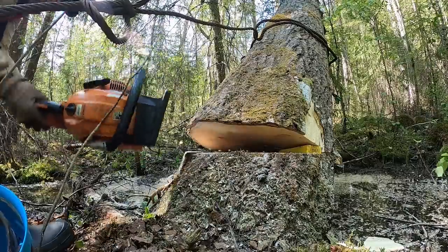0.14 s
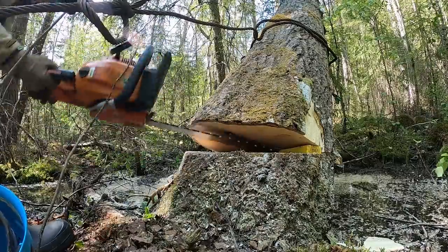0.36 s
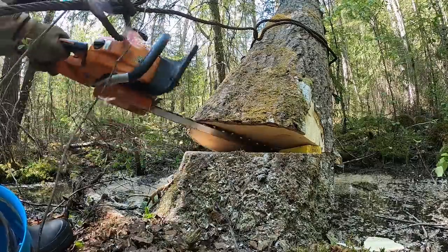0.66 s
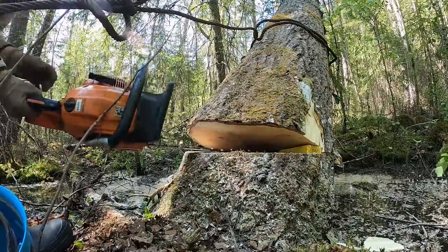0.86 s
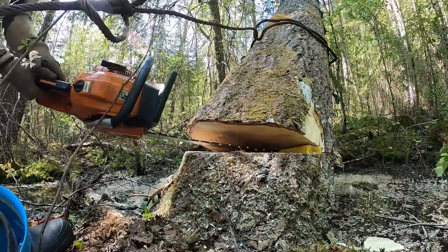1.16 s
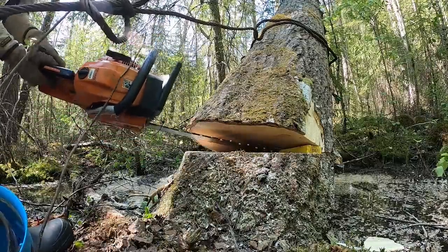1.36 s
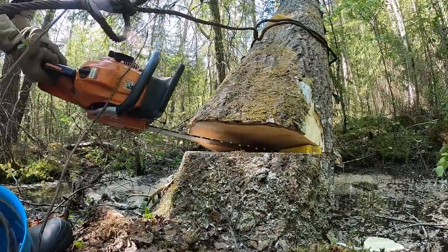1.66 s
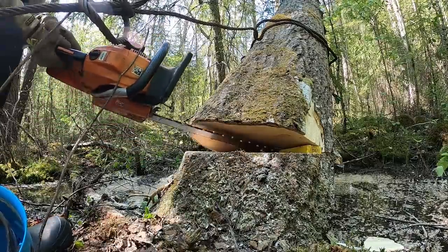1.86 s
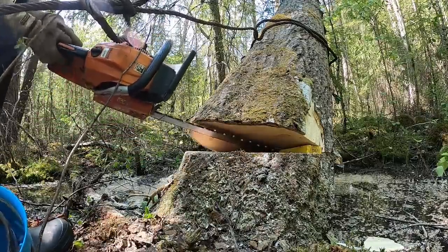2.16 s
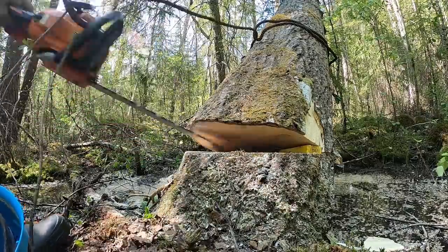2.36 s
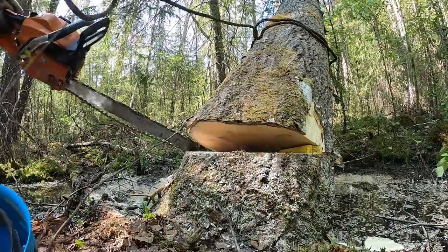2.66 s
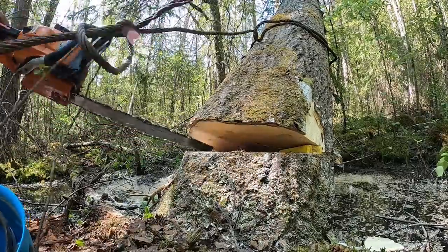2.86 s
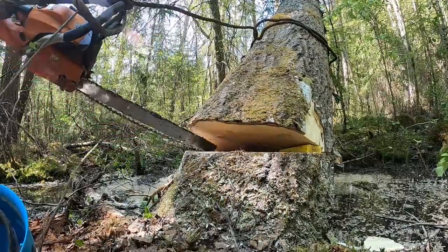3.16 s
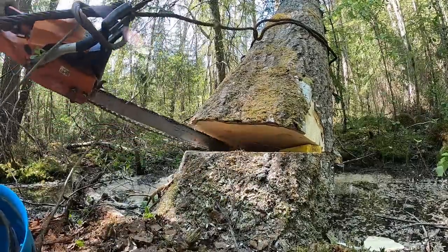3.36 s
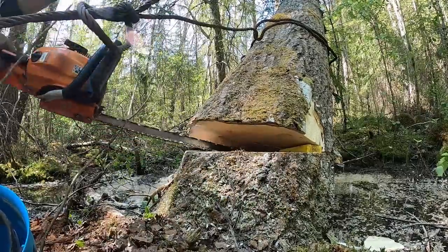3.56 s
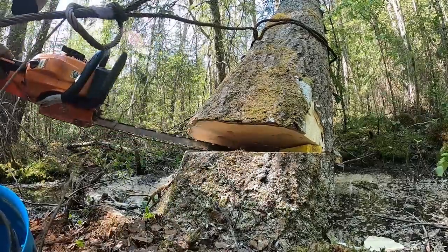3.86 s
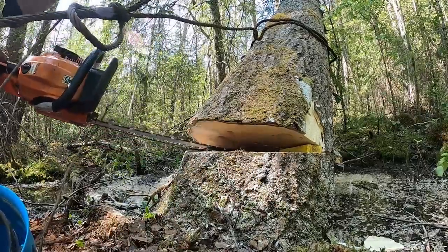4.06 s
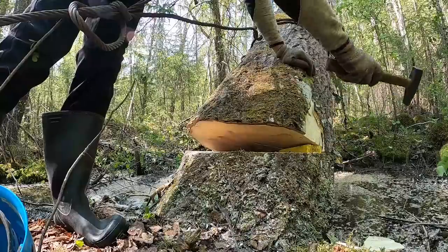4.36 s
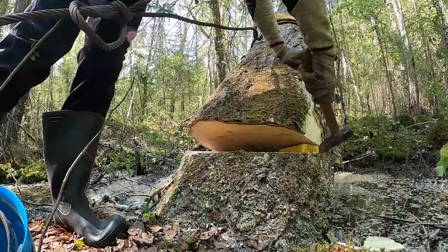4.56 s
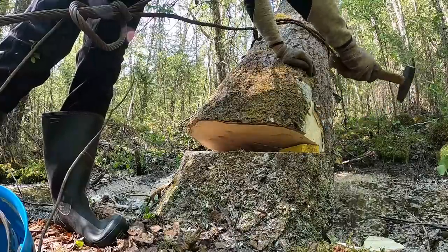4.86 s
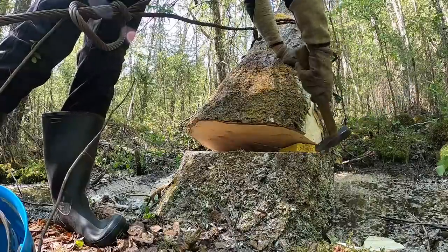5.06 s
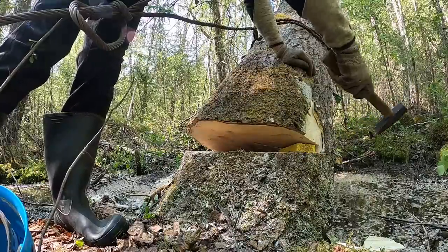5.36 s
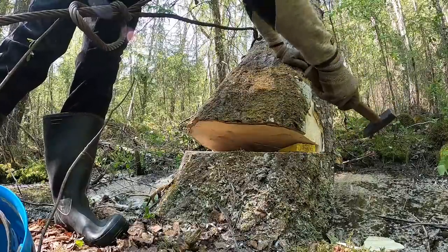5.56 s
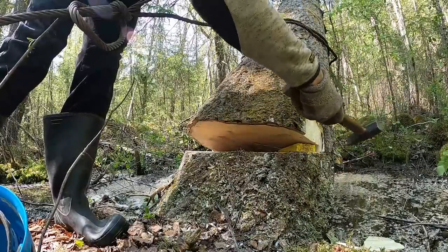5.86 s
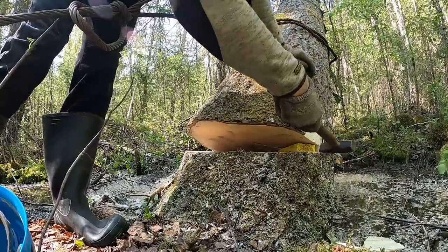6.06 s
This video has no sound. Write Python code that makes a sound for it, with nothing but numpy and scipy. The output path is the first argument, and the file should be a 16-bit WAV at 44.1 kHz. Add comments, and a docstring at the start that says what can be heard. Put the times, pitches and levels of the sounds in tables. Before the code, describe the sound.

Close by in a quiet forest, dry twigs snap and rustle while boots and wood thud on soft ground. After a short lull the crackling returns, the bar of a stopped chainsaw pings and its chain briefly catches in the cut. A hammer then drives a wedge into a trunk with three hard blows, each a short clink over a woody boom. One light tap comes last.

```python
"""A quiet forest, a stereo microphone close to a worker shifting a stopped saw. From the start dry twigs
snap and rustle, and heavier wood and boots thud on soft ground. After a lull with one faint far peep
they stir again and the saw bar pings. Near 3.7 s the chain teeth catch in the cut. From 4.2 s a hammer
drives a wedge into a trunk: three hard blows among lighter touches, the wedge ringing over the trunk's
boom. Two faint rings hang in the distance, and one light tap comes last."""
import sys
import numpy as np
from scipy import signal
from scipy.fft import rfft, irfft, next_fast_len
from scipy.io import wavfile
from scipy.ndimage import uniform_filter1d

SR = 44100
rng = np.random.default_rng(int(sys.argv[2]) if len(sys.argv) > 2 else 0)


def int16_out(signal):
    """Quantize to a 16-bit WAV file."""
    q = np.round(np.clip(np.atleast_2d(signal).T, -1, 1) * 32767)
    wavfile.write(sys.argv[1], SR, q.astype(np.int16))


N = 273861

# hush of far leaves and air: freq_hz, density_db
AIR_COLOUR = [(110, -19.5), (150, 2), (274, -3.5), (620, -14.5), (748, -19.5), (1090, -6.5), (1920, -8.5),
              (4090, -10.5), (7350, -17.5), (15000, -63.5)]
# how alike the hush is left and right: freq_hz, likeness
AIR_LIKENESS = [(60, 0.19), (380, 0.86), (2380, 0.58), (15000, 0.0304)]
# far leaves swelling: time_s, gain_db
BREEZE = [(0, 4.5), (1.3, 1), (1.65, -2.5), (2., 1), (4.2, 1), (5., -0.5), (6.2, 2)]
# swells of rumble from ground and air at the microphone: top_s, level_db, fade_db_per_s
RUMBLE_SWELLS = [(.2, -39, 320), (.46, -51, 216), (1.3, -54, 162), (1.559, -51.5, 299), (1.96, -47.5, 167),
                 (2.81, -28, 129), (3.56, -41, 107), (3.96, -43, 93), (4.238, -43, 109.5),
                 (4.7, -51.5, 101), (5.1, -49, 59), (5.221, -49, 150.5), (6.2, -55, 101)]
# colour of that rumble: freq_hz, density_db
RUMBLE_COLOUR = [(15, -4.5), (35, 13), (80, -4), (160, -7.5), (320, -22), (600, -46.5)]
# far off, a high peep, then two rings after the last hard blow: start_s, length_s, pitch_hz, level_db
FAR_RINGS = [(1.663, 0.14, 5020, -63.5), (5.252, 0.26, 1630, -58.5), (5.42, .16, 2090, -61.5)]
# echoes off the surrounding trunks: freq_hz, t60_s
ECHO_DECAY = [(300, 0.1), (1000, 0.36), (2200, 0.44), (8000, 0.051)]
# where the worker moves in front of the microphone: time_s, left_over_right_db
WORKER_PAN = [(0, 1), (2.2, 3), (2.5, 1), (2.8, 7), (3.1, 2.5), (3.45, 4)]
# how alike close wood is left and right: freq_hz, likeness
NEAR_LIKENESS = [(100, 1), (1400, 0.96), (3100, 0.74), (7000, 1), (12000, 0.0475)]
# colour of breaking wood: freq_hz, density_db
TWIG_COLOUR = [(88, -58), (150, -7), (332, -8), (583, -9.5), (1170, -5.5), (3910, -9), (4750, -9),
               (7410, -18), (15500, -45.5)]
# tiny twigs and bark stirring; the last row is a dull rustling echo after the second hard blow:
# top_s, level_db, hold_s, treble_db
RUSTLES = [(0.152, -24, 0.005, -15), (0.337, -38.5, 0.0079, -12), (0.454, -31, 0.037, -5),
           (0.622, -34.5, 0.036, -6.5), (0.855, -29, 0.0062, -11.5), (0.941, -34.5, 0.08, -15),
           (1.161, -48, 0.046, -22), (1.846, -56, 0.084, -5), (1.896, -51.5, 0.2, -8),
           (2.458, -28.5, 0.086, -9.5), (2.521, -23.5, 0.054, -2), (2.642, -36, 0.25, -1.5),
           (2.94, -41.5, 0.11, -2), (3.059, -30, 0.017, -13), (3.138, -43.5, 0.33, -4),
           (3.486, -40.5, 0.076, -7), (3.645, -37.5, 0.12, -4), (3.829, -53.5, 0.22, 1),
           (4.74, -53, 0.074, -13)]
# twigs breaking close by: break_s, level_db, ring_hz, treble_db
SNAPS = [(.0036, -28.5, 1900, -15.5), (0.0382, -32, 1080, -23), (0.09, -38.5, 990, -1),
         (.106, -35, 1630, -24), (0.1373, -21, 1160, -3.5), (0.1514, -23.5, 1160, -13),
         (0.166, -28.5, 3100, -2), (0.1749, -20.5, 2100, -7), (0.1853, -32, 1630, -20),
         (.216, -33.5, 1530, -4), (0.2832, -25.5, 1500, -6), (0.338, -34.5, 1300, 1),
         (0.397, -27, 1350, -4.5), (.427, -16.5, 1060, -14.5), (0.4447, -20.5, 2460, -2),
         (0.463, -25, 1780, 4), (0.4722, -24, 770, -5), (0.4895, -19.5, 3200, 7.5), (0.496, -29, 3100, 15),
         (0.5113, -28.5, 1140, 6), (0.591, -19.5, 1280, -4.5), (0.6103, -31, 1100, -5),
         (0.629, -25.5, 990, 0), (0.633, -18.5, 2960, 0), (0.641, -24.5, 1310, -7), (0.6653, -22, 2270, -1),
         (0.6773, -26.5, 3050, 12), (0.6978, -25.5, 2190, -9), (.735, -37.5, 1170, 4),
         (0.7775, -31, 2380, -3), (0.8108, -19, 1600, -13), (0.826, -20.5, 2700, -2),
         (0.8334, -13.5, 2670, -10.5), (0.8548, -25.5, 813, -8), (0.865, -32, 1800, -6),
         (0.889, -24, 1640, -10), (0.938, -29, 2000, -7), (0.9547, -29, 2610, -13),
         (.981, -27.5, 1260, -25), (0.9853, -17.5, 1660, -5.5), (1.009, -31.5, 4150, 24),
         (1.024, -28, 1830, -8), (1.0767, -27, 2200, -10), (1.1177, -34.5, 1460, -15),
         (1.184, -45.5, 1890, 11), (1.2294, -43, 1070, 0), (1.292, -45.5, 1850, 4),
         (1.3608, -41.5, 2350, 10), (1.4436, -48.5, 1866, -2), (1.824, -47, 1400, -17),
         (2.027, -41.5, 1110, -20), (2.062, -49, 1710, -8), (2.161, -42, 4460, 10),
         (2.412, -43.5, 1170, -19), (2.452, -28, 2120, 13), (2.4666, -25.5, 4870, 6.5),
         (2.478, -29, 4260, 12), (2.5145, -18, 1770, -0.5), (2.5266, -17.5, 1020, -7),
         (2.5552, -25, 2350, 3), (2.571, -28, 3970, 10), (2.58, -26.5, 1650, 3), (2.6545, -28, 985, -37),
         (2.7, -27, 1810, -13), (2.7232, -40, 5840, 14), (2.7964, -27, 2120, 9), (2.813, -24.5, 1930, 1),
         (2.846, -24, 3950, -0.5), (2.911, -33, 2440, -9), (2.944, -38.5, 4300, 29),
         (2.985, -32.5, 2400, 2), (2.9899, -19, 2360, 6), (3.007, -24.5, 2400, 4), (3.0107, -20, 1200, 1),
         (3.0449, -23, 3000, 0), (3.0635, -33, 2320, -13), (3.079, -29, 2770, -15),
         (3.2327, -20.5, 1090, 2), (3.2641, -29.5, 970, -2), (3.3812, -36, 2440, -1),
         (3.4118, -30.5, 1860, -1), (3.444, -25.5, 2000, 1), (3.474, -37.5, 1060, -11),
         (3.49, -22.5, 2400, 7.5), (3.5047, -33, 2500, -5), (3.618, -36, 2420, -12),
         (3.645, -34.5, 3900, 32), (3.656, -31, 2070, -13), (3.672, -50, 3460, 6), (3.6973, -24, 2540, -2),
         (3.8633, -33, 950, 1), (3.89, -36.5, 1000, -6), (3.963, -43.5, 1786, 2), (4.08, -46.5, 5800, 9)]
# heavy wood and boots on soft ground: start_s, level_db, first_hz, last_hz, t60_s
THUDS = [(0.137, -32.5, 564, 242, 0.15), (0.314, -36.5, 300, 220, 0.051), (0.4273, -8, 556, 230, 0.046),
         (0.435, -18, 130, 112, 0.082), (0.628, -32.5, 295, 142, 0.13), (0.8172, -9, 523, 247, 0.037),
         (0.822, -25, 132, 110, 0.15), (0.963, -39, 255, 211, 0.11), (1.182, -39, 288, 213, 0.038),
         (2.437, -31, 298, 193, 0.1), (2.532, -17.5, 400, 187.6, 0.1), (2.791, -7, 275, 120, 0.036),
         (3.03, -23.5, 380, 214, 0.041), (3.418, -32, 257, 107, 0.066), (3.544, -20.5, 446, 94, 0.092),
         (3.941, -31, 148, 58.5, 0.041)]
# pings of the saw bar: start_s, level_db, damped_from_s
PINGS = [(2.457, -38, 2.65), (2.556, -31, 2.5), (2.702, -33.5, 2.762)]
# modes of the free bar: pitch_hz, level_db, t60_s
BAR_MODES = [(4347, 0, .6), (6864, -12, .12)]
# single chain teeth catching: start_s, level_db
TOOTH_CATCHES = [(3.7249, -21.5), (3.7409, -19.5), (3.7628, -20)]
# quick drags of the chain: start_s, end_s, level_db, teeth_per_s
CHAIN_DRAGS = [(3.706, 3.782, -35, 330), (3.79, 3.822, -30, 165)]
# modes of the bar held in the cut: pitch_hz, level_db
CUT_MODES = [(700, -5), (1000, 0), (1300, 2), (1730, 3.5), (2380, -9), (3400, -7)]
# hammer on the wedge: start_s, level_db, favoured_hz, boom_db, tilt_db_per_octave
BLOWS = [(4.198, -36.5, 1250, -32, -4), (4.209, -22.5, 1260, -48.5, -7), (4.2197, 0.5, 1640, -6, -3),
         (4.482, -43.5, 1295, -70.5, 6.5), (4.671, -33, 820, -66, 0), (4.6824, -27, 860, -60, -8.5),
         (4.6882, -7, 1160, -59, -16.5), (4.6924, -0.5, 1930, -12, -0.5), (4.733, -37, 1150, -39, -6),
         (5.183, -33, 1250, -59, -4.5), (5.1944, -14, 1280, -29, -4.5), (5.1969, -17, 1250, -28, -7),
         (5.2033, 0.5, 1770, -16.5, -2.5), (5.248, -35, 1560, -36, -6), (6.187, -29.5, 1520, -40, 6.5)]
# modes of wedge and hammer head: pitch_hz, level_db, t60_s
WEDGE_MODES = [(756, -9.5, 0.026), (1230, -2, 0.009), (1652, -4.5, 0.013), (2037, -6, 0.0099),
               (2600, -5, 0.0085), (3310, 12, 0.0023), (4420, -5, 0.0078), (5670, -10.5, 0.0079),
               (7550, -15, 0.0035), (9730, -18, 0.0021), (12980, -22, 0.0036)]
# boom of the trunk: first_hz, last_hz, t60_s
TRUNK_BOOM = (460, 141, 0.055)
# treble balance of the microphone pair: freq_hz, left_over_right_db
MIC_BALANCE = [(6000, 1), (9000, -1.5), (15000, -6.5)]

AIR_DB, RUMBLE_REST_DB = -59, -68.5
STIR_DB_PER_S, SETTLE_DB_PER_S = 310, 230
LEAD_IN_SAMPLES, SNAP_T60_S, CUT_T60_S = 176, 0.032, 0.021
DUCK_ABOVE_DB, BAND_EDGE_HZ = -19.5, 15750


def amp(db):
    """Decibels to gain."""
    return 10 ** (np.asarray(db) / 20)


def unit_rms(x):
    """Scales to rms 1."""
    return x / np.sqrt(np.mean(x ** 2) + 1e-20)


def at_hz(table, hz):
    """Value of a table on a log-frequency axis."""
    freq_hz, value = np.transpose(table)
    return np.interp(np.log(hz + 1), np.log(freq_hz + 1), value)


def add(mix, start_s, sound):
    """Mixes a sound into a stereo track."""
    part = mix[:, round(start_s * SR):][:, :sound.shape[-1]]
    part += sound[..., :part.shape[1]]


def pan(db):
    """Left and right gains, db apart."""
    return amp([db / 2 * np.ones(1), -db / 2 * np.ones(1)])


def stereo_noise(a, b, likeness, gain):
    """Blends noises a and b into a pair, alike by the table likeness and coloured by gain(hz)."""
    size = next_fast_len(len(a))
    hz = np.fft.rfftfreq(size, 1 / SR)
    alike = np.clip(at_hz(likeness, hz), 0, 1)
    left = rfft(a, size)
    right = alike * left + np.sqrt(1 - alike ** 2) * rfft(b, size)
    return unit_rms(irfft(np.array([left, right]) * gain(hz), size)[:, :len(a)])


def smoothed(noise, samples):
    """Running mean of a noise, at rms 1."""
    return unit_rms(uniform_filter1d(noise, size=samples))


def swell(top_s, db, hold_s, rise_db_per_s, fade_db_per_s):
    """Power of one swell: rises until top_s, holds, fades."""
    t = np.arange(N) / SR - top_s
    return amp(2 * (db + rise_db_per_s * np.minimum(t, 0) - fade_db_per_s * np.maximum(t - hold_s, 0)))


def hush():
    """Leaves and air far off, and a lumpy rumble of ground and air at the microphone."""
    a, b, c, d, lumps = rng.standard_normal((5, N))
    air = stereo_noise(a, b, AIR_LIKENESS, lambda hz: amp(at_hz(AIR_COLOUR, hz)))
    air *= amp(np.interp(np.arange(N) / SR, *np.transpose(BREEZE)))
    rumble = stereo_noise(c, d, [(25, 0.68), (100, 0.52)], lambda hz: amp(at_hz(RUMBLE_COLOUR, hz)))
    swells = sum(swell(s, db, 0, 1.14 * fade, fade) for s, db, fade in RUMBLE_SWELLS)
    rumble *= np.sqrt(swells + amp(2 * RUMBLE_REST_DB))
    return amp(AIR_DB) * air * pan(0.53) + rumble * amp(0.89 * smoothed(lumps, 2000))


def far_ring(length_s, pitch_hz, db):
    """A fuzzy narrow ring that swells and fades deep in the forest."""
    noise = rng.standard_normal((2, round(length_s * SR)))
    ring = unit_rms(signal.lfilter(*signal.iirpeak(pitch_hz, Q=14, fs=SR), noise))
    return amp(db) * ring * np.hanning(noise.shape[1]) ** .5


def trunk_echoes(x):
    """Sparse echoes off the trunks all round, each band dying at its own speed."""
    taps = np.zeros((2, SR))
    arrivals = np.arange(900, SR - 20, 20) + rng.integers(0, 20, (2, (SR - 901) // 20))
    np.put_along_axis(taps, arrivals, rng.choice([-1., 1.], arrivals.shape), 1)
    hz, t, bands = signal.stft(taps, SR, nperseg=256)
    build_up = np.minimum(t / 0.21, 1)  # the trunks stand apart, so the echoes gather slowly
    decay = amp(-60 * t / at_hz(ECHO_DECAY, hz)[:, None])
    tail = signal.istft(bands * build_up * decay, SR, nperseg=256)[1]
    return signal.fftconvolve(x.mean(0)[None], tail / np.linalg.norm(tail[0]), axes=1)[:, :N]


def rustle():
    """Tiny uneven cracks come in clumps; thick and thin pieces crack partly on their own."""
    swells = np.array([swell(s, db, hold, STIR_DB_PER_S, SETTLE_DB_PER_S) for s, db, hold, _ in RUSTLES])
    treble_db = np.transpose(RUSTLES)[3][swells.argmax(0)]  # the loudest swell sets the colour
    treble_db = uniform_filter1d(treble_db, size=1300)
    a, b = rng.standard_normal((2, N))
    noise = stereo_noise(a, b, NEAR_LIKENESS, lambda hz: amp(at_hz(TWIG_COLOUR, hz)))
    sizes = amp(2.8 * np.minimum(rng.exponential(1, (7, N)), 3))
    cracks = sizes * (rng.random((7, N)) < 180 / SR)
    shared, *per_band = signal.lfilter([1], [1, -np.exp(-1 / (0.0021 * SR))], cracks)
    out, below = np.zeros((2, N)), 0
    for top_hz, own in zip([700, 1400, 2400, 4000, 8000, 20000], per_band):
        up_to = signal.sosfiltfilt(signal.butter(2, top_hz, fs=SR, output="sos"), noise)
        crackle = unit_rms(0.3 + 0.7 * unit_rms(shared) + 1.4 * unit_rms(own))
        treble = amp(treble_db * np.clip(0.63 * np.log2(top_hz / 2800), 0, 1.6))
        out += (up_to - below) * crackle * treble
        below = up_to
    clumps = amp(1.52 * smoothed(rng.standard_normal(N), 600))
    return out * unit_rms(clumps) * np.sqrt(swells.sum(0))


def twig_gain(hz, rings_hz, treble_db):
    """Colour of one twig: three rings, more treble if thin and dry, too small to radiate bass."""
    shelves_db = treble_db / (1 + (3500 / (hz + 1)) ** 4) - 7 / (1 + (11000 / (hz + 1)) ** 4)
    rings = 1 + sum(g / (1 + ((hz - f) / (0.076 * f)) ** 2) for f, g in zip(rings_hz, [1.5, .7, .7]))
    bass_cut = 1 / (1 + (450 / (hz + 1)) ** 3)
    return amp(at_hz(TWIG_COLOUR, hz) + shelves_db) * rings * bass_cut


def twig_snap(db, ring_hz, treble_db):
    """Fibres tear in a quick burst and ring the twig near one pitch; the treble dies first."""
    t = (np.arange(3072) - LEAD_IN_SAMPLES) / SR  # a faint 4 ms lead-in softens each snap's start
    after = np.maximum(t, 0)
    t60 = SNAP_T60_S * amp(4 * rng.standard_normal())
    a, b, lumps = rng.standard_normal((3, len(t)))
    rings_hz = ring_hz * np.append(1, 2 ** rng.uniform(-1, 1.374, size=2))
    burst = stereo_noise(a, b, NEAR_LIKENESS, lambda hz: twig_gain(hz, rings_hz, treble_db))
    burst *= amp(0.19 * smoothed(lumps, 40))
    dull = signal.lfilter(*signal.butter(2, 3000, fs=SR), burst)
    bright = (burst - dull) * amp(-25 * after / t60)
    lead_in = amp(-19.5 + 8500 * np.minimum(t, 0)) * np.exp(-after / 0.0004)
    tear = amp(-60 * after / t60) * (1 - np.exp(-after / 0.00013))
    scrape = amp(-18.5 - 60 * after / 0.055) * (1 - np.exp(-after / 0.001))  # the broken ends rub on
    sound = burst * lead_in + (dull + bright) * tear + dull * scrape
    return amp(db) * sound / np.sqrt(np.mean(sound[:, LEAD_IN_SAMPLES:LEAD_IN_SAMPLES + 260] ** 2))


def thud(db, first_hz, last_hz, t60):
    """A heavily damped push whose pitch sinks as the contact spreads; wood and soil shudder on."""
    t = np.arange(12000) / SR
    hz = last_hz + (first_hz - last_hz) * np.exp(-t / 0.0033)
    turns = np.cumsum(hz) / SR
    onset = np.sin(np.minimum(2 * turns, np.pi / 2)) ** 2
    push = amp(-60 * t / t60) * onset * -np.sin(2 * np.pi * turns)
    noise = rng.standard_normal((2, len(t))) * 0.12 + rng.standard_normal(len(t))
    band = signal.butter(1, [0.62 * last_hz, 1.09 * last_hz], "band", fs=SR)
    shudder = unit_rms(signal.lfilter(*band, noise))
    shudder = signal.lfilter(*signal.butter(2, 500, fs=SR), shudder)
    shudder *= amp(-10.5 - 60 * t / (3.46 * t60)) * (1 - np.exp(-t / 0.0011))
    return amp(db) * (push / abs(push).max() + shudder)


def bar_ping(start_s, db, damped_from_s):
    """The steel saw bar rings in its modes and dies fast once it touches wood."""
    t = np.arange(6000) / SR
    ring = sum(amp(mode_db - 60 * t / t60) * np.sin(2 * np.pi * hz * t) for hz, mode_db, t60 in BAR_MODES)
    touching_s = np.maximum(t + start_s - damped_from_s, 0)
    return amp(db - 60 * touching_s / 0.036) * ring * pan(2.3)


def chain_teeth():
    """Each tooth that catches knocks the bar in the cut, its modes struck unevenly."""
    catches = list(TOOTH_CATCHES)
    for start_s, end_s, db, per_s in CHAIN_DRAGS:
        times = np.arange(start_s, end_s, 1 / per_s)
        jitter, size = rng.standard_normal((len(times), 2)).T
        catches += zip(times + 0.15 * jitter / per_s, db + 2.2 * size)
    t, out = np.arange(1500) / SR, np.zeros((2, N))
    hz, mode_db = np.transpose(CUT_MODES)[:, :, None]
    for start_s, db in catches:
        uneven, phase = rng.standard_normal((2, len(CUT_MODES), 1))
        modes = np.sin(2 * np.pi * (hz * (1 + 0.043 * uneven) * t + phase))
        knock = (amp(mode_db + 2.5 * uneven - 60 * t / CUT_T60_S) * modes).sum(0)
        knock *= 1 - np.exp(-t / 0.0003)
        add(out, start_s, amp(db) * knock / abs(knock).max())
    return out


def hammer_blow(db, favoured_hz, boom_db, tilt_db):
    """The wedge rings briefly, most in the modes the struck spot favours; the trunk booms just after."""
    t = np.arange(12000) / SR
    hz, mode_db, t60 = np.transpose(WEDGE_MODES)[:, :, None]
    spot_db = -10 * np.minimum(abs(np.log2(hz / favoured_hz)), 1.2)
    crisp_db = tilt_db * np.log2(1 + hz / 2000)  # a square hit is crisper than a glancing one
    phase = rng.random(hz.shape) + 0.033 * rng.standard_normal((2, *hz.shape)) * np.sqrt(hz / 4000)
    modes = np.sin(2 * np.pi * (hz * t + phase))
    ring = (amp(mode_db + spot_db + crisp_db - 60 * t / t60) * modes).sum(1)
    ring *= 1 - np.exp(-(t / (.0003 - 3e-5 * db)) ** 2)  # lighter touches start more softly
    grit = rng.standard_normal((2, len(t))) * amp(-22 - 60 * t / 0.033)  # bark and fibres crush
    dull = signal.lfilter(*signal.butter(1, 3600, fs=SR), ring)
    ring += signal.oaconvolve(dull, grit, axes=1)[:, :len(t)]
    boom = np.roll(thud(boom_db, *TRUNK_BOOM), round(0.002 * SR), axis=1)
    return amp(db) * ring / abs(ring.mean(0)).max() * pan(-2.7) + boom


def scene():
    """Twigs, thuds, saw and hammer up close, with their echoes and the hush behind."""
    worker, hammer, background = rustle() + chain_teeth(), np.zeros((2, N)), hush()
    for break_s, *row in SNAPS:
        add(worker, max(break_s - LEAD_IN_SAMPLES / SR, 0), twig_snap(*row))
    worker *= pan(np.interp(np.arange(N) / SR, *np.transpose(WORKER_PAN)))
    for start_s, *row in THUDS:
        add(worker, start_s, thud(*row))
    for start_s, *row in PINGS:
        add(worker, start_s, bar_ping(start_s, *row))
    for start_s, *row in BLOWS:
        add(hammer, start_s, hammer_blow(*row))
    for start_s, *row in FAR_RINGS:
        add(background, start_s, far_ring(*row))
    bark = smoothed(rng.standard_normal(N), 50)  # rough trunks smear the ring of the wedge
    echoes = trunk_echoes(amp(-34) * worker + amp(-41) * hammer * bark)
    return background + echoes + worker + hammer


def record(dry):
    """Microphone pair, gain control that ducks the hush after loud hits, soft overload, band limit."""
    size = next_fast_len(N)
    balance = pan(at_hz(MIC_BALANCE, np.fft.rfftfreq(size, 1 / SR)))
    left, right = irfft(rfft(dry, size) * balance, size)[:, :N]
    mics = np.array([np.roll(left, 1), right])  # the left microphone is a little farther away
    power_db = 10 * np.log10(abs(uniform_filter1d((mics ** 2).mean(0), size=200)) + 1e-12)
    fall_db = np.arange(N) * 60. / SR
    held_db = np.maximum.accumulate(power_db + fall_db) - fall_db  # held peaks sink 60 dB a second
    over_db = np.maximum(held_db - DUCK_ABOVE_DB, 0)
    late_db = np.roll(uniform_filter1d(over_db, size=200), 200)  # the attack slips through
    ducked = mics / amp(.5 * late_db)
    rounded = ducked / (1 + ducked ** 6) ** (1 / 6)
    lowpass = signal.firwin(401, BAND_EDGE_HZ, window=("kaiser", 12), fs=SR)
    return signal.oaconvolve(rounded, lowpass[None], "same")


dry = scene()
out = record(dry)
int16_out(out)
```